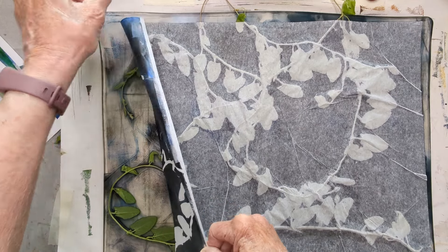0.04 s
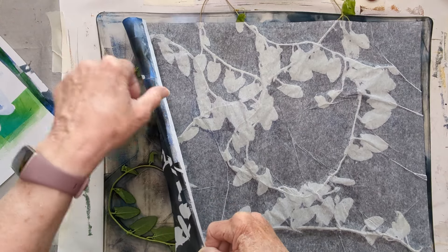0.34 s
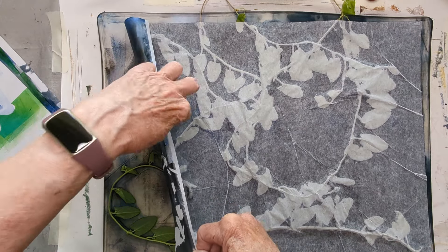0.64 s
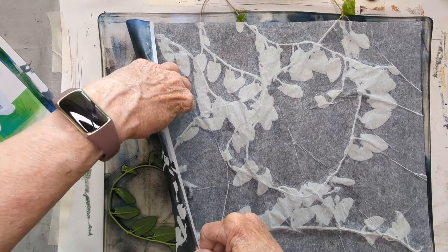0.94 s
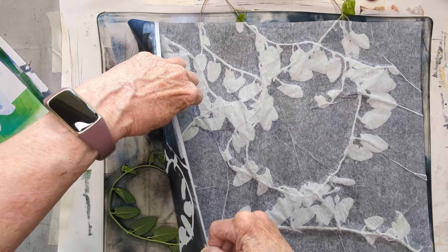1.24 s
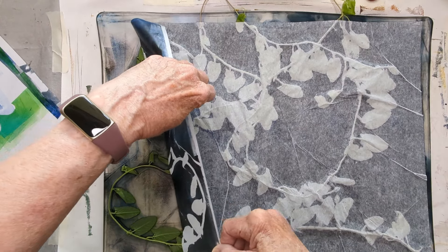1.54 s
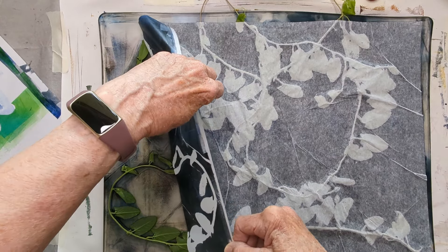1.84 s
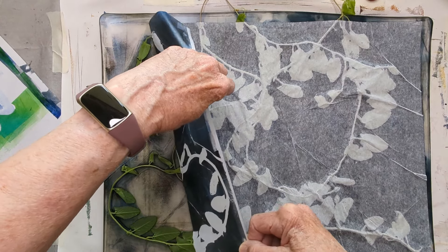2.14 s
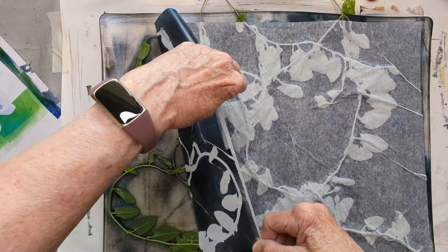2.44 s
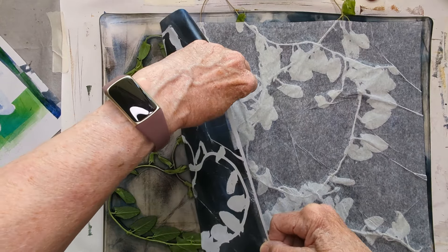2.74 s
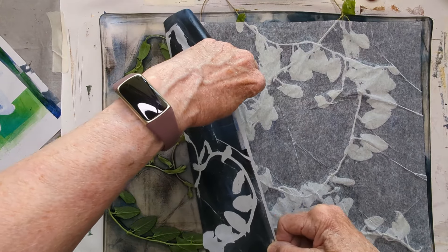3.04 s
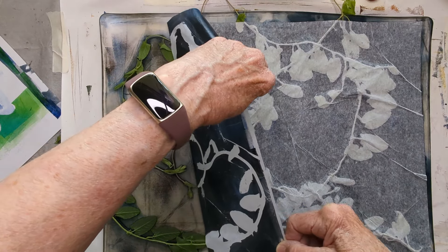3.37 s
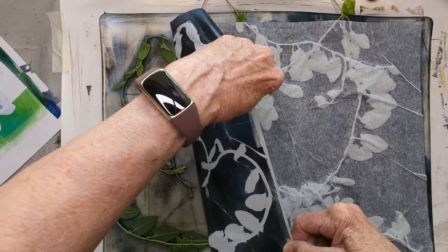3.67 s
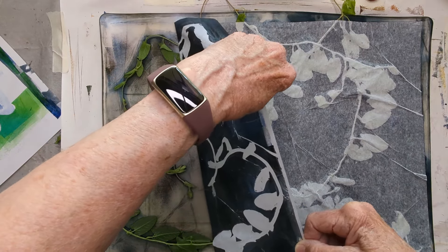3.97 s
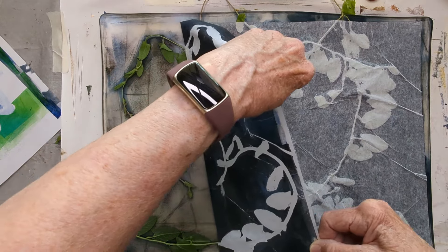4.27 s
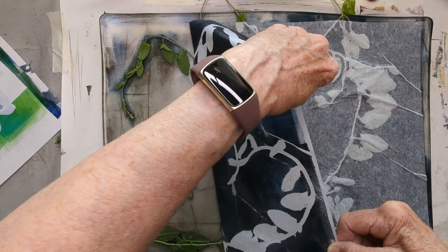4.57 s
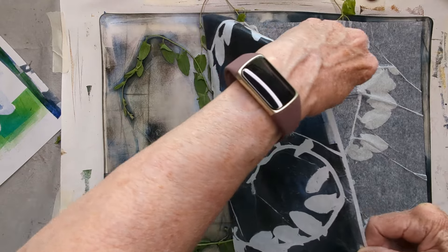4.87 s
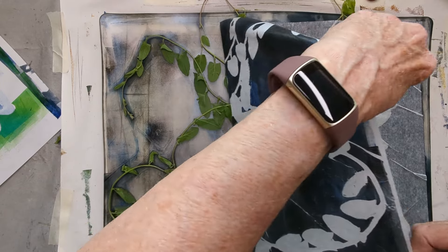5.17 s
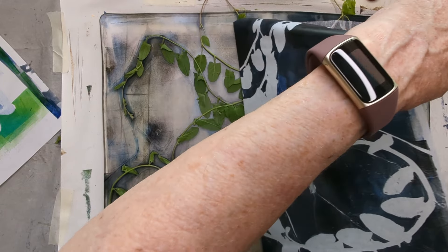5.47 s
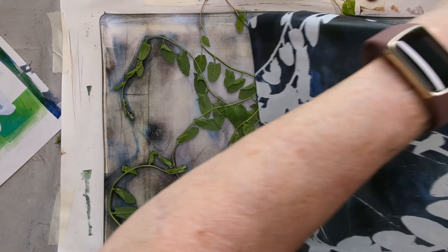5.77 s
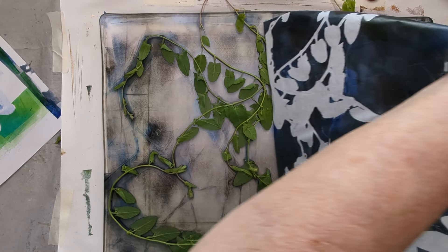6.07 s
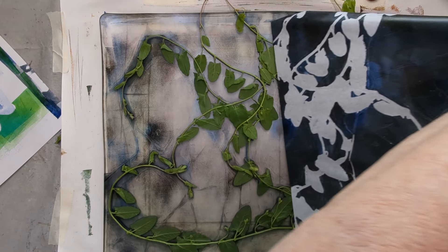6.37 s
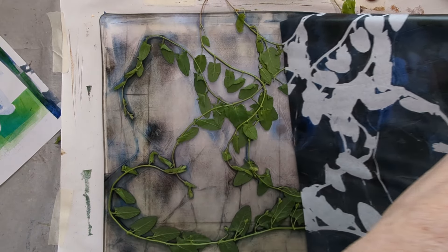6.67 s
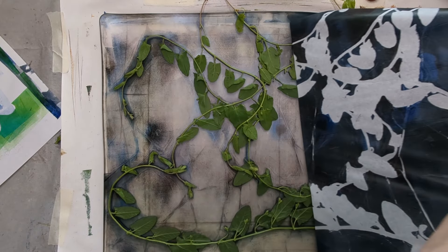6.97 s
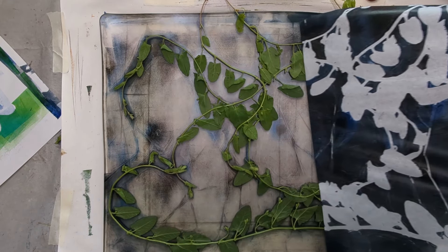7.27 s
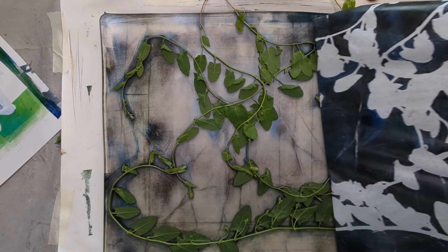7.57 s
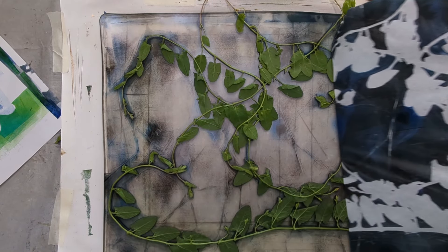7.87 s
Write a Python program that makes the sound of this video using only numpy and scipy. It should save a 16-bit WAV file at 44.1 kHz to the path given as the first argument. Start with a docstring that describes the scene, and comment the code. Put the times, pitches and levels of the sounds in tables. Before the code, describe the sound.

Thin paper is slowly peeled off a sticky painted plate, ticking and crinkling, then crackling densely over a low motor hum.

```python
"""First, two motors hum and slowly beat over the rumble of ventilation in a small studio. Close to the
microphone, thin paper is peeled off a tacky, paint-covered printing plate: the curling sheet ticks and
crinkles as its creases flip. Further off, at about 1.5 s, something wooden knocks softly once.
From about 4.6 s a steady pull makes the threads of paint let go in a dense crackle."""
import sys
import numpy as np
from scipy import signal
from scipy.fft import rfft, irfft, next_fast_len
from scipy.io import wavfile
from scipy.ndimage import uniform_filter1d, map_coordinates

SR = 44100
rng = np.random.default_rng(int(sys.argv[2]) if len(sys.argv) > 2 else 0)


def transcribe(signal):
    """Save signal, clipped to [-1, 1], as a 16-bit WAV file at the path in sys.argv[1]."""
    frames = np.atleast_2d(signal).T
    limited = np.clip(frames, -1, 1)
    pcm = np.round(limited * 32767).astype(np.int16)
    wavfile.write(sys.argv[1], SR, pcm)


N = 353241

# Weaker hum tones alongside the motors. Each row: frequency in Hz, rms level in dB.
HUM_TONES = [(41.1, -59), (120, -67), (176.6, -69), (195.5, -55.5), (220.6, -54.5), (235.2, -68),
             (479, -70), (538.3, -71)]
# Spectra of the ventilation and the faint hiss. Each row: frequency in Hz, relative level in dB.
RUMBLE_COLOUR = [(20, -22), (33, -26), (45, 0), (100, 2), (118, -3.5), (232, 2.5), (265, -9.5), (320, -4.5),
                 (370, -11), (535, -12.5), (580, -20.5), (670, -18.5), (800, -30), (1100, -21.5),
                 (1700, -38)]
HISS_COLOUR = [(300, -13), (800, -1), (1100, 7.5), (2500, 2), (5000, -5.5), (8500, -11.5), (10000, -24),
               (12000, -15), (16000, -26)]
# Resonances of the moving air. Each row: centre in Hz, width in Hz, strength in dB.
AIR_RESONANCES = [(99.2, 10, -1.5), (154.46, 6.65, 14)]
# The steady pull on the sheet. Each row: time in seconds, relative crackle level in dB.
PULL = [(0, -77), (.55, -81.5), (1.0, -80), (2.0, -69), (2.42, -67), (2.55, -76), (3.2, -83), (4.33, -72),
        (4.75, -57), (5.03, -51), (5.5, -53), (6.1, -51), (6.42, -59), (6.72, -53), (7.0, -63), (7.12, -55),
        (7.46, -58), (8.01, -51)]
# Tugs, each freeing one patch of paint. Each row: start in seconds, length in seconds,
# relative crackle level in dB, relative rustle level in dB.
TUGS = [(0.352, .045, -63, -59.5), (0.691, .06, -71, -77), (0.813, 0.023, -67, -78),
        (1.079, 0.043, -65, -61), (1.124, 0.059, -56, -55.5), (1.215, 0.087, -60, -70),
        (1.325, .03, -65, -61), (1.581, .15, -72, -66.5), (1.855, .065, -62, -58), (1.972, 0.032, -57, -72),
        (2.129, 0.073, -56, -55), (2.281, 0.039, -60, -58), (2.342, .04, -50, -60),
        (2.418, 0.031, -55, -56), (2.602, 0.041, -66, -73), (2.703, 0.036, -63, -70),
        (2.785, 0.073, -63, -65), (3.264, 0.027, -70, -62), (3.68, 0.16, -75, -67),
        (3.922, 0.087, -73, -64.5), (4.044, 0.056, -66, -63.5), (4.192, 0.064, -67, -64),
        (4.366, 0.038, -69, -56.5), (4.436, 0.036, -62, -64), (4.509, 0.042, -57, -72),
        (4.714, .09, -54, -59), (4.956, 0.057, -51, -58.5), (5.051, 0.091, -55, -57),
        (5.193, .06, -49, -54), (5.544, .06, -54, -54), (5.665, 0.033, -49, -57), (5.773, .1, -50, -55.5),
        (6.179, 0.05, -50, -59), (6.275, 0.034, -52, -54), (6.341, 0.033, -52, -59), (6.469, .11, -50, -65),
        (6.69, .15, -52, -64), (6.914, 0.044, -58, -58), (7.053, 0.097, -56, -57), (7.235, .04, -56, -54.5),
        (7.32, .09, -58, -63), (7.522, 0.048, -53, -57.5), (7.671, 0.054, -50.5, -52.5),
        (7.771, .08, -50, -45), (7.874, 0.064, -55, -50.5), (7.944, 0.067, -48, -47.5)]
# Tone of the parting paint and of the lifted sheet. Each row: frequency in Hz, gain in dB.
CRACKLE_COLOUR = [(500, -15.5), (2000, -10.5), (3600, -4), (5500, -4), (6500, -2.5), (7400, -4.5),
                  (8600, 2), (9800, -7), (11800, 0), (16000, -5.5)]
RUSTLE_COLOUR = [(150, -7.5), (450, 1), (780, -7.5), (950, -0.5), (1180, -2.5), (1600, 0), (2200, -1.5),
                 (3500, -3), (6000, -10), (16000, -56)]
# Resonances of sheet and plate. Each row: centre in Hz, width in Hz, strength in dB.
PLATE_RESONANCES = [(2122, 89, -3.5), (3780, 180, -12), (6590, 430, -5.5)]
# The paper buckles. Each row: start in seconds, relative level in dB, brightness in dB.
CREASES = [(0.3584, -50, 4), (.392, -46.5, -4), (0.8194, -52.5, 5), (1.0914, -49.5, -1.5),
           (1.1746, -50.5, 1), (1.2393, -44, 6.5), (1.2635, -44.5, 9.5), (1.2992, -49.5, 13),
           (1.4401, -50, -5), (1.5907, -45.5, -2), (1.7237, -40, -2), (1.8767, -48, -1), (1.929, -50, -10),
           (1.9806, -39, 7.5), (2.0755, -45.5, 4), (2.125, -46, 4.5), (2.1474, -37, 3), (2.2059, -43, 1),
           (2.238, -46.5, 5), (2.2887, -45, -6.5), (2.349, -37, 3.5), (2.374, -43, 2), (2.4294, -43, -3),
           (2.4404, -39.5, 21), (2.611, -47, -1.5), (2.6391, -48, 7), (2.7216, -43.5, 6.5),
           (2.771, -54, -21), (2.787, -35.5, 10.5), (2.8258, -49.5, 5), (2.8712, -50.5, 1),
           (2.9236, -53, 4), (3.0296, -42, -0.5), (3.068, -58, 6), (3.1109, -54.5, -25), (3.279, -47, -11),
           (3.3796, -48, -4), (3.436, -59, -9), (3.4801, -56, 0.5), (3.5483, -57.5, 1), (3.992, -52.5, 4),
           (4.0616, -48, -3.5), (4.0942, -48, 19), (4.144, -44.5, 0.5), (4.1982, -44, -0.5),
           (4.388, -49.5, -13), (4.6272, -39.5, 12.5), (4.6393, -40.5, 12), (4.806, -41.5, 9),
           (5.0168, -37, 16), (5.3653, -40.5, -5), (5.7575, -40, -4.5), (5.8484, -35, 4.5),
           (5.9394, -40, -10.5), (6.1014, -37.5, 7), (6.3429, -38.5, 0), (6.4825, -39, 3), (6.6674, -38, 8),
           (6.694, -40, 5), (6.7758, -39, 6), (7.0634, -42, 1), (7.093, -38, 26), (7.114, -40.5, 5),
           (7.146, -35.5, 0), (7.1825, -37.5, -12.5), (7.196, -46, 0), (7.2353, -43, 1), (7.2474, -38.5, 8),
           (7.4011, -40.5, 16), (7.4569, -46, 12), (7.7815, -40, -1), (7.8246, -33.5, 4)]
# Tone of a flipping crease. Each row: frequency in Hz, gain in dB.
SNAP_COLOUR = [(300, -46), (900, -6.5), (2000, 1), (3600, 2.5), (5000, 0), (8500, 3), (12000, -1.5),
               (16000, -6)]
# Contacts within the wooden knock. Each row: start in seconds, relative level in dB.
WOOD_CONTACTS = [(1.456, -45), (1.468, -42), (1.485, -46.5), (1.504, -54)]
# Modes of the wood. Each row: frequency in Hz, relative level in dB, seconds to fall 60 dB.
WOOD_MODES = [(356, 0, 0.08), (405, 0.5, 0.082), (465, 4.5, 0.09), (509, -5, 0.069), (950, -10, 0.028),
              (1250, -11, .03), (1320, -13, .03), (1410, -10, .05), (1680, -17, .03), (3690, -23, .25)]

FULL_PULL_DB = -50  # crackle level of a firm pull


def amp(db):
    """Decibels to gain."""
    return 10 ** (np.asarray(db) / 20)


def unit(x):
    """Scale to rms 1."""
    return x / np.sqrt(np.mean(x ** 2) + 1e-20)


def clock():
    """The time of every sample, in seconds."""
    return np.arange(N) / SR


def wobble(rate):
    """A smooth random curve with `rate` knots a second."""
    return map_coordinates(rng.standard_normal(int(N * rate / SR) + 4), [clock() * rate])


def coloured(x, points, resonances=()):
    """Minimum-phase filter through (Hz, dB) points, lifted at (Hz, width in Hz, dB) resonances."""
    size = 2 * next_fast_len(len(x) // 2 + 4096)
    hz = np.fft.rfftfreq(size, 1 / SR)
    point_hz, point_db = np.transpose(points)
    gain = amp(np.interp(np.log(hz + 1), np.log(point_hz), point_db))
    peaks = sum(amp(db) / (1 + (2 * (hz - centre) / width) ** 2) for centre, width, db in resonances)
    cepstrum = irfft(np.log(gain * (1 + peaks)), size)
    cepstrum[1:size // 2] *= 2
    cepstrum[size // 2 + 1:] = 0
    return irfft(rfft(x, size) * np.exp(rfft(cepstrum)), size)[:len(x)]


def motor_hum():
    """Two motors just under mains speed drift in and out of step; weaker tones waver alongside."""
    t = clock()
    shaft_hz, beat_s, in_step_s = 58.85, 2.26, 1.58
    shaft = 2 * np.pi * shaft_hz * t + rng.uniform(0, 2 * np.pi)
    lead = 2 * np.pi * (t - in_step_s) / beat_s
    motors = amp(-42.5) * np.sin(shaft) + amp(-47.0) * np.sin(shaft + lead)
    tones = sum(amp(db + 1.55 * wobble(2.89)) * np.sin(2 * np.pi * hz * t + 0.6 * wobble(2.037))
                for hz, db in HUM_TONES)
    return motors + np.sqrt(2) * tones


def ventilation():
    """Moving air rumbles in the room, with a faint, even hiss."""
    rumble = unit(coloured(rng.standard_normal(N), RUMBLE_COLOUR + [(6000, -68)], AIR_RESONANCES))
    hiss = unit(coloured(rng.standard_normal(N), HISS_COLOUR))
    return amp(-46.0) * rumble + amp(-69.0) * hiss


def pull_levels():
    """Crackle and rustle levels in dB: the steady pull, tugs on top, a stall before each of CREASES."""
    t = clock()
    pull_db = np.interp(t, *np.transpose(PULL)) + 0.68 * wobble(14)  # the tack varies across the plate
    crackle_power = amp(pull_db) ** 2
    rustle_power = amp(-52.5 + 0.75 * (pull_db - FULL_PULL_DB)) ** 2
    attack_s, fall_db_per_s = .012, 350  # a patch gives way quickly and dies away
    for start, length, crackle_db, rustle_db in TUGS:
        span = slice(round(start * SR), round(start * SR) + SR // 2)
        age = t[span] - start
        tug = np.clip(age / attack_s, 0, 1) * amp(-fall_db_per_s * np.maximum(age - length, 0))
        crackle_power[span] += (amp(crackle_db) * tug) ** 2
        rustle_power[span] += (amp(rustle_db) * tug) ** 2
    stall_db = np.zeros(N)
    depth_db, stall_s = 3.5, .012  # the peel line sticks just before a crease flips
    for start, _, _ in CREASES:
        before = slice(round(start * SR) - SR // 10, round(start * SR))
        stall_db[before] += depth_db * np.exp((t[before] - start) / stall_s)
    return 10 * np.log10(crackle_power) - stall_db, 10 * np.log10(rustle_power) - stall_db


def grains(per_s, low_hz, high_hz, cycles, spread_db):
    """Tiny damped rings at random moments, each with its own pitch and size, held near rms 1."""
    starts = np.flatnonzero(rng.random(N) < per_s / SR)
    pitch_draw, size_draw, phase = np.hsplit(rng.random((len(starts), 3)), 3)
    hz = low_hz + (high_hz - low_hz) * pitch_draw
    size = amp(spread_db * np.minimum(-np.log(1 - size_draw), np.pi))
    offsets = np.arange(128)
    turns = hz * offsets / SR
    rings = size * np.sqrt(hz) * np.exp(-turns / cycles) * np.sin(2 * np.pi * (turns + phase))
    stream = unit(np.bincount((starts[:, None] + offsets).ravel(), rings.ravel(), N)[:N])
    power = uniform_filter1d(uniform_filter1d(stream ** 2, size=4000), size=4000)
    return stream / np.sqrt(np.abs(power) + 1e-4)


def peel(crackle_db, rustle_db):
    """Threads of paint part one by one and shake the lifted sheet; a faster pull is louder and denser."""
    threads_per_s = np.clip(3800 * amp(.6 * (crackle_db - FULL_PULL_DB)), 400, 6500)
    slip = amp(wobble(90) + 3 * wobble(350))  # the peel line advances in lurches and quicker jitters
    paint = grains(threads_per_s, low_hz=1420, high_hz=15300, cycles=0.86, spread_db=6.5)
    sheet = grains(.7 * threads_per_s, low_hz=410, high_hz=4400, cycles=0.76, spread_db=4.5)
    bright = unit(coloured(paint, CRACKLE_COLOUR, PLATE_RESONANCES))
    soft = coloured(bright, [(8000, 4.0), (11000, -8.0)])  # a slow peel lacks the finest cracks
    speed = np.clip((crackle_db + 71.5) / 14, 0, 1)
    crackle = amp(crackle_db + 0.5) * (speed * bright + (1 - speed) * soft)
    rustle = amp(rustle_db - 1.5) * unit(coloured(sheet, RUSTLE_COLOUR, PLATE_RESONANCES))
    return slip * (crackle + rustle)


def lesser_creases(crackle_db, per_s=18):
    """Small creases flip at random, as strongly as the sheet is pulled: rows like those of CREASES."""
    starts = np.flatnonzero(rng.random(N) < per_s / SR)
    size, colour = rng.standard_normal((len(starts), 2)).T
    level_db = crackle_db[starts] + 7 + 4.5 * np.clip(size, -2, 1)
    bright_db = 3 + 5 * colour
    return list(zip(starts / SR, level_db, bright_db))


def crease_snaps(creases):
    """A crease flips: a spike and a sharp crack, an echo off the table, a short shiver of the sheet."""
    out, t = np.zeros(N + SR), np.arange(SR // 20) / SR
    for start, db, bright_db in creases:
        crack = amp(-60 * t / 0.0033)
        echo_age = t - rng.uniform(0.00053, .0018)
        echo = 0.55 * (echo_age > 0) * amp(-60 * np.abs(echo_age) / 0.0031)
        shiver = .17 * amp(-60 * t / .028)
        attack = 1 - np.exp(-t / .0001)
        burst = (crack + echo + shiver) * attack * rng.standard_normal(len(t))
        burst[SR // 5000] += 2.5 * rng.choice([-1, 1])  # the spike
        # narrow creases sound brighter and ring higher than wide ones
        tilt_db = 0.7 * (bright_db - 2)
        tilt = [(3000, -tilt_db), (6000, 0), (13000, 0.57 * tilt_db)]
        ring_hz = np.clip(4400 * amp(0.603 * bright_db + rng.normal(0, 1)), 2000, 12000)
        burst = coloured(burst, tilt, [(ring_hz, 1100, -1)])
        burst = coloured(burst, SNAP_COLOUR, PLATE_RESONANCES)
        out[round(start * SR):][:len(t)] += amp(db + 21.5) * burst / np.linalg.norm(burst)
    return out[:N]


def wooden_knock():
    """A light wooden thing rocks through a few soft contacts, each a ring and a scuff."""
    out, t = np.zeros(N + SR), np.arange(SR // 3) / SR
    scuff_colour = [(450, -1), (700, -9), (1400, 12), (1900, -16), (3500, -8.5), (9000, -38)]
    for start, db in WOOD_CONTACTS:
        ring = np.zeros(len(t))
        for hz, mode_db, t60 in WOOD_MODES:
            decay = amp(mode_db + rng.normal(0, 1.5) - 60 * t / t60)
            ring += decay * np.sin(2 * np.pi * hz * rng.normal(1, 0.022) * t)
        scuff = coloured(rng.standard_normal(len(t)), scuff_colour) * amp(-60 * t / 0.044)
        out[round(start * SR):][:len(t)] += amp(db - 6) * (ring + 3.5 * scuff)
    return out[:N]


def studio(direct, table_db, table_t60, room_db, room_t60):
    """Quick scatter off the work table, then the room's smooth, diffuse tail."""
    t = np.arange(SR // 3) / SR
    fade = lambda t60: unit(amp(-60 * t / t60) * (t > .0005)) / np.sqrt(len(t))
    decay = np.hypot(amp(table_db) * fade(table_t60), amp(room_db) * fade(room_t60))
    out, step = np.pad(direct, (0, SR)), SR // 40
    for start in range(0, N, step):
        echoes = signal.fftconvolve(direct[start:start + step], decay * rng.standard_normal(len(t)))
        out[start:start + len(echoes)] += echoes
    return out[:N]


def scene():
    """One microphone in the humming studio: paper close up, the knock further off with more room on it."""
    crackle_db, rustle_db = pull_levels()
    paper = peel(crackle_db, rustle_db) + crease_snaps(CREASES + lesser_creases(crackle_db))
    paper = studio(paper, table_db=-5.5, table_t60=0.04, room_db=-15, room_t60=0.26)
    wood = studio(wooden_knock(), table_db=-3, table_t60=0.061, room_db=-3, room_t60=0.83)
    return (paper + wood + motor_hum() + ventilation())[None]


def record(dry):
    """The recorder keeps nothing above its band limit."""
    size, top_hz = next_fast_len(N + SR // 2), 15900
    in_band = np.fft.rfftfreq(size, 1 / SR) < top_hz
    return irfft(rfft(dry, size) * in_band, size)[..., :N]


dry = scene()
out = record(dry)
transcribe(out)
```